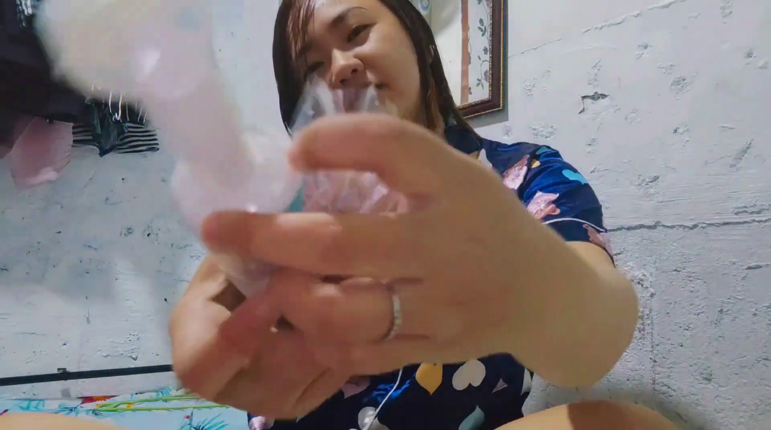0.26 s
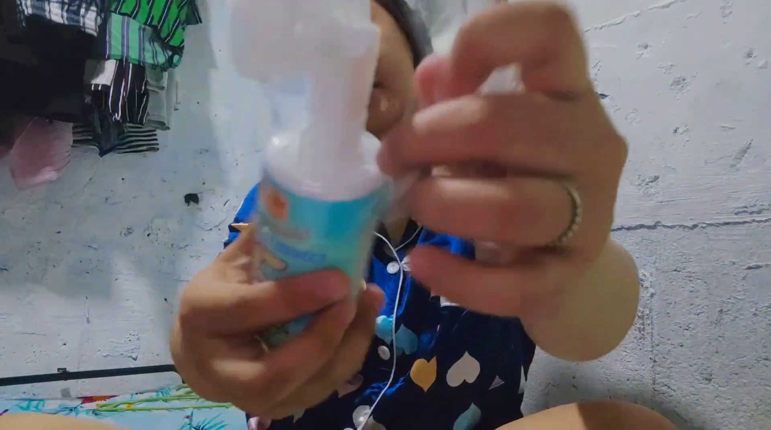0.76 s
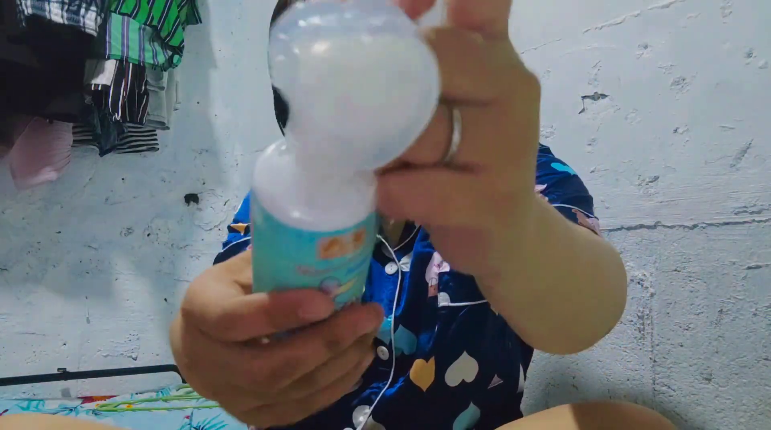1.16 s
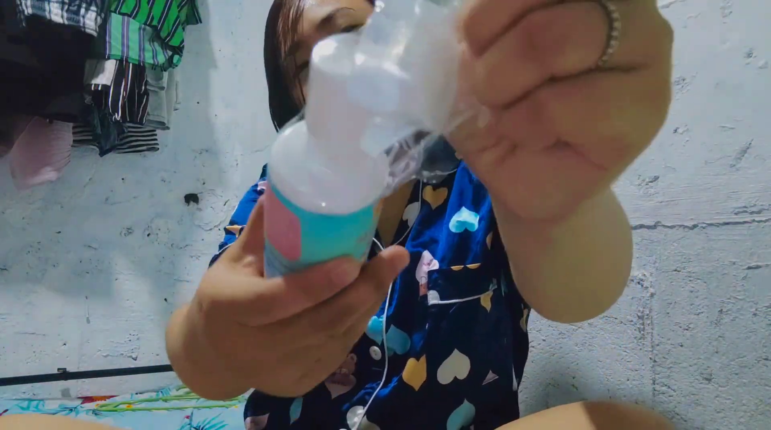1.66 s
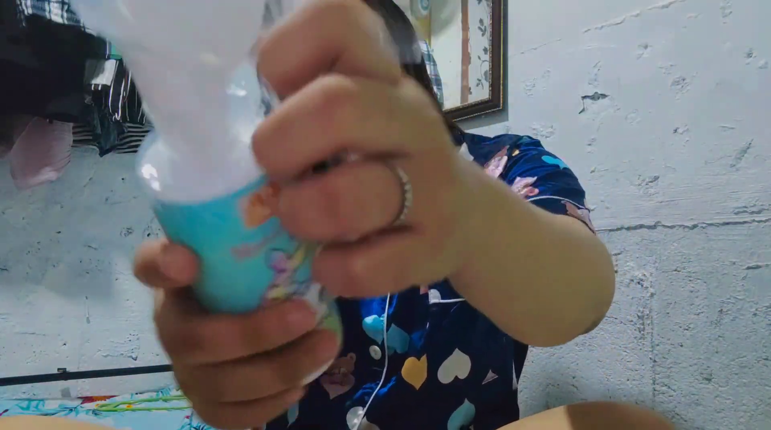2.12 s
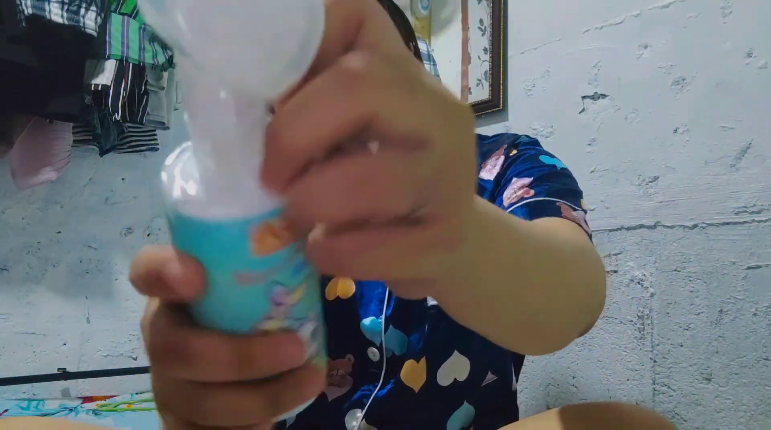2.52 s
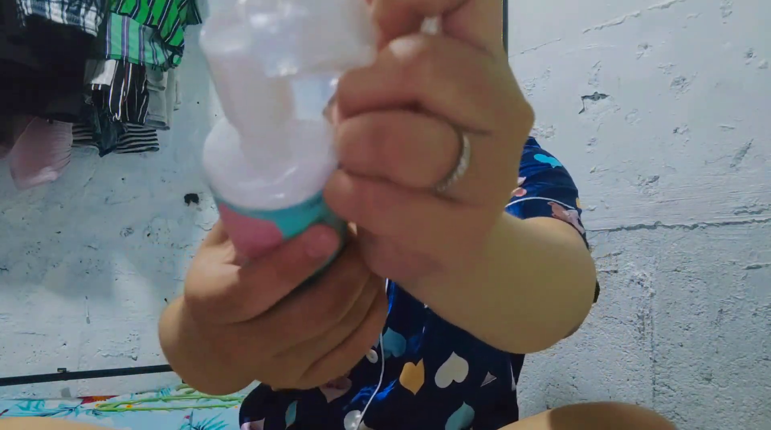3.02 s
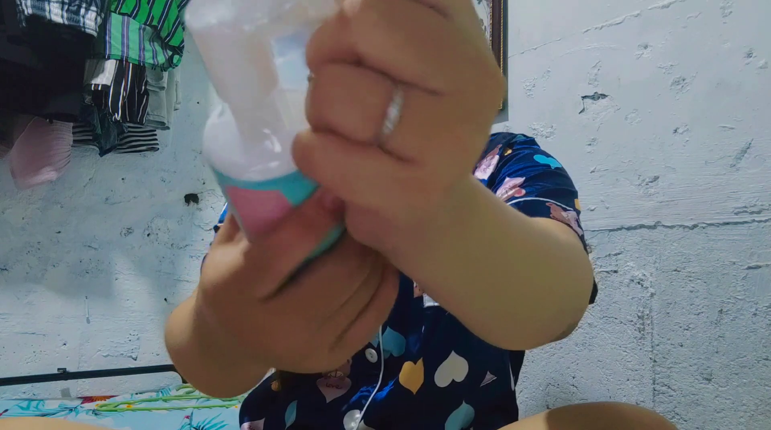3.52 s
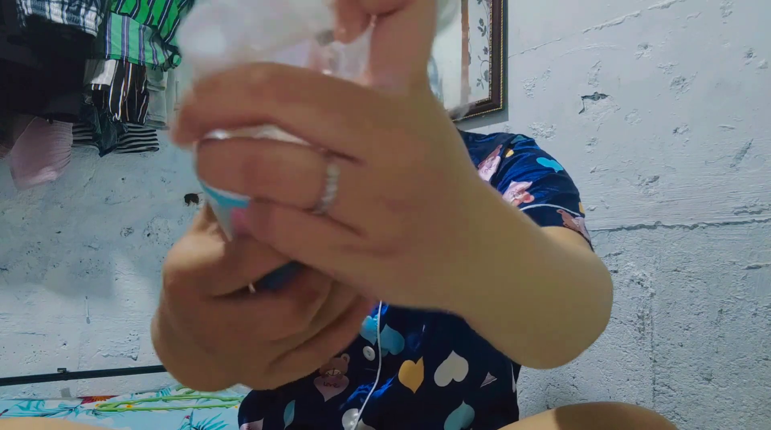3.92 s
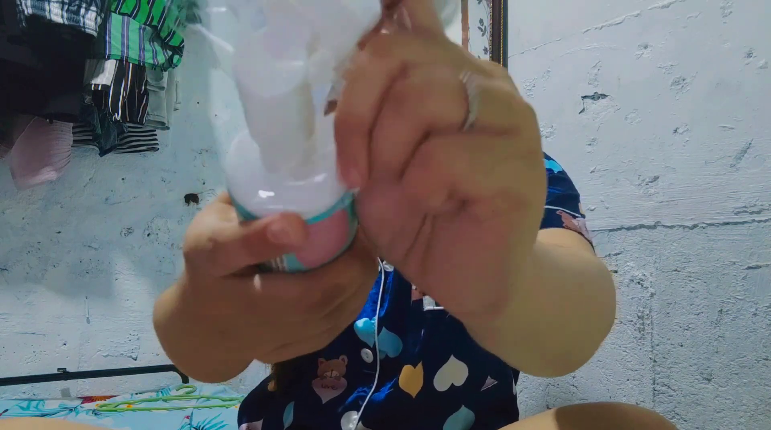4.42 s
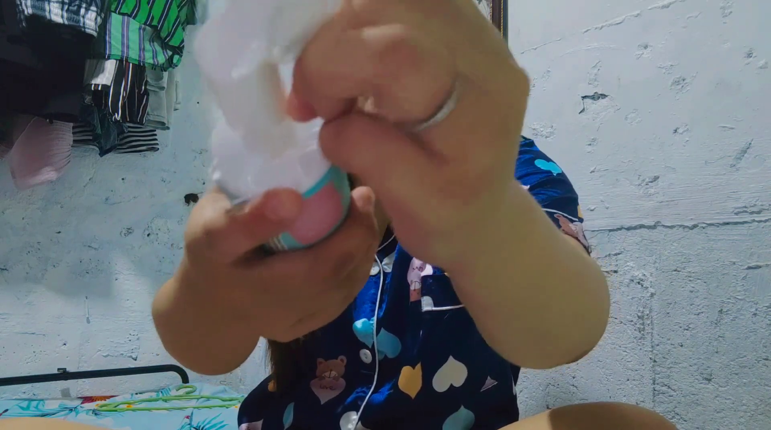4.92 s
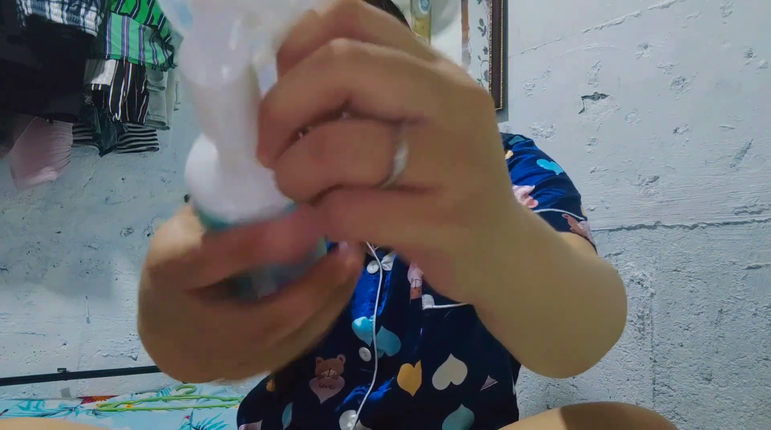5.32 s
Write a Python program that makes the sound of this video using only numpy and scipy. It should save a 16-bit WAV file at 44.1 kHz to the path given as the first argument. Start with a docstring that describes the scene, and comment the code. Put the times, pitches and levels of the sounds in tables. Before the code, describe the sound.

Hands squeeze and pull thin plastic wrap on a small plastic bottle. Dense bright crackling starts at once and continues to the end, in uneven bursts with sharp snaps, hollow pops and tiny high rings. Soft skin rustles and a few low thumps sit beneath. Small hard-walled room with faint appliance hum; very close stereo phone microphone, the loudest snaps clipping.

```python
"""Plastic wrapping crumpled by hand

A hand crumples thin plastic film on a bottle, close to a phone, in a small hard-walled room.
Each crease gives a noise crack, a hollow decaying-sine pop and a brief high ring; many small creases crackle.
Soft rustles, a few low thumps and a noise-made appliance hum join in; the loudest snaps clip."""
import sys
import numpy as np
from scipy import signal
from scipy.fft import rfft, irfft, next_fast_len
from scipy.io import wavfile
from scipy.ndimage import uniform_filter1d

SR = 44100
rng = np.random.default_rng(int(sys.argv[2]) if len(sys.argv) > 2 else 0)


def generate_wav(signal):
    """Clip the signal to [-1, 1] and save it as 16-bit WAV at the path in sys.argv[1]."""
    frames = np.transpose(np.atleast_2d(signal))
    scaled = np.clip(frames, -1, 1) * 32767
    pcm = np.round(scaled).astype(np.int16)
    wavfile.write(sys.argv[1], SR, pcm)


N = 245637
LEAD_S = 0.002  # a crease shape starts this long before its peak


def amp(db):
    """dB to gain."""
    return 10 ** (np.asarray(db) / 20)


def unit(x):
    """Scale to rms 1."""
    return x / np.sqrt(np.mean(x ** 2) + 1e-20)


def along(points, hz):
    """Interpolate (Hz, value) points on a log frequency axis."""
    f, v = np.transpose(points)
    return np.interp(np.log(hz + 1), np.log(f + 1), v)


def filtered(x, response):
    """Multiply the spectrum of x by a complex response of frequency."""
    m = next_fast_len(N + SR // 2)
    spectrum = rfft(x, m) * response(np.fft.rfftfreq(m, 1 / SR))
    return irfft(spectrum, m)[..., :N]


def causal(points):
    """Minimum-phase response with the given dB curve, by folding the cepstrum."""
    def response(hz):
        ceps = irfft(np.log(amp(along(points, hz))))
        half = len(ceps) // 2
        ceps[1:half] *= 2
        ceps[half + 1:] = 0
        return np.exp(rfft(ceps))
    return response


def pair(a, b):
    """Left and right from a shared and an opposed signal: alike in the bass, unrelated in the treble."""
    # Left-right likeness. Each row: frequency in Hz, correlation (1 = identical).
    likeness = [(100, .75), (300, .6), (700, .85), (1500, .55), (3000, .3), (8000, .15), (15000, .1)]

    def mid_side_gains(hz):
        turn = np.arccos(np.clip(along(likeness, hz), -1, 1)) / 2
        return [np.cos(turn), np.sin(turn)]
    mid, side = filtered(np.array([a, b]), mid_side_gains)
    return np.array([mid + side, mid - side])


def room_tone():
    """Appliance hum and faint broad air: stereo noise under a fixed spectral curve."""
    # Spectrum of the tone. Each row: frequency in Hz, relative density in dB.
    tone_curve = [(20, -38), (78, -20), (93, -2), (110, -20.5), (300, -19.5), (1000, -39), (8000, -85),
                  (16000, -63)]
    noise = pair(*rng.standard_normal((2, N)))
    coloured = unit(filtered(noise, lambda hz: amp(along(tone_curve, hz))))
    return amp([[-52], [-54]]) * coloured


def crackle_db(t):
    """Crackle level: each squeeze swells fast, sags while held, fades as the fingers let go."""
    # Closings of the fingers. Each row: full grip at in seconds, hold in seconds,
    # crackle level in dB (relative).
    squeezes = [(0.0, 0.18, -30), (0.09, 0.13, -18.5), (0.341, 0.16, -22.5), (0.598, 0.052, -29),
                (0.676, 0.16, -25.5), (0.86, 0.084, -28.5), (0.989, 0.05, -23.5), (1.115, 0.1, -31),
                (1.236, 0.089, -28.5), (1.384, 0.062, -15), (1.625, 0.11, -24), (1.828, 0.2, -29),
                (2.011, 0.16, -21.5), (2.178, 0.18, -29.5), (2.402, 0.13, -23), (2.589, 0.24, -21),
                (2.884, 0.16, -26.5), (3.113, 0.034, -30), (3.223, 0.04, -30.5), (3.285, 0.067, -19),
                (3.381, 0.11, -27.5), (3.637, 0.25, -21.5), (3.959, 0.065, -19.5), (4.068, 0.41, -26),
                (4.216, 0.22, -22.5), (4.478, 0.13, -23.5), (4.658, 0.27, -26.5), (4.959, 0.14, -32),
                (5.186, 0.057, -17.5), (5.35, 0.0063, -24.5), (5.409, 0.04, -21), (5.498, 0.042, -25)]
    grip_db_per_s, sag_db_per_s, let_go_db_per_s = 748, 14.5, 302
    s, hold, db = np.transpose(squeezes)[:, :, None]
    hold = np.abs(hold)
    swell = grip_db_per_s * np.maximum(s - t, 0)
    sag = sag_db_per_s * np.clip(t - s, 0, hold)
    fade = let_go_db_per_s * np.maximum(t - s - hold, 0)
    power = amp(db - swell - sag - fade) ** 2
    return 10 * np.log10(np.sum(power, axis=0))


def patchy(depth_db):
    """Stereo noise whose colour wanders over time, a little differently at each port."""
    z = signal.stft(rng.standard_normal((2, N)), nperseg=128)[2]
    bins, frames = z.shape[1:]
    field = rng.standard_normal((3, bins, frames))  # shared, left, right
    field = uniform_filter1d(uniform_filter1d(field, size=4, axis=1), size=6, axis=2)
    tilt = uniform_filter1d(rng.standard_normal(frames), size=8) * np.linspace(-1, 1, bins)[:, None]
    field[0] += 0.32 * tilt  # some moments dull, others bright
    field = field - field.mean(axis=1, keepdims=True)  # colour only, loudness comes from the creases
    noise = pair(*signal.istft(z, nperseg=128)[1][:, :N])
    z = signal.stft(noise, nperseg=128)[2]
    z = z * amp(depth_db * unit(field[0] + 0.64 * field[1:]))
    return unit(signal.istft(z, nperseg=128)[1][:, :N])


def lay(s, shapes, pan_db):
    """Add one shape at each time into two channels."""
    start = np.round(np.abs(s - LEAD_S) * SR).astype(int)
    at = (start[:, None] + np.arange(shapes.shape[1])).ravel()
    channels = []
    for side in (1, -1):
        panned = shapes * amp(side * pan_db / 2)[:, None]
        channels.append(np.bincount(at, panned.ravel(), N + SR)[:N])
    return np.array(channels)


def creases(s, crack_db, pop_db, pop_hz, crack_t60_s):
    """Buckling creases: power outlines for noise cracks, plus pops of a few cycles with brief high rings."""
    tick, tick_t60_s = 0.4, 0.004  # extra height of a crack's tip, its decay
    zing_hz_mid, zing_log_spread, zing_db, zing_t60_s = 6500, 0.4, -9, 0.007  # dB re crack
    body_share, body_db = 0.25, 2.5  # how far a crack's low part follows its pop, offset
    pop_cycles = 8.4  # cycles per 60 dB of decay
    t = np.arange(700) / SR - LEAD_S
    luck = rng.standard_normal((len(s), 6))

    life_s = crack_t60_s * np.exp(luck[:, :1] / 5)
    outline = amp(crack_db[:, None] - 60 * np.where(t > 0, t, -3 * t) / life_s)  # swell 3x the fade rate
    outline = outline * (1 + tick * amp(-60 * np.abs(t) / tick_t60_s))  # sharp tick at buckling
    body = outline * amp(body_db + body_share * (pop_db - crack_db))[:, None]

    t = np.maximum(t + 0.001278, 0)  # pop and zing start just before the crack's peak
    hz = pop_hz[:, None]
    ring = amp(-60 * t * hz / pop_cycles) * (1 - np.exp(-t * hz / 0.83))
    glide = 1 + 25 * luck[:, 2:3] * t
    pop = np.sign(luck[:, 1:2]) * amp(pop_db[:, None]) * ring * np.sin(2 * np.pi * hz * t * glide)

    # each crack carries a very short high ring at a random pitch
    zing_hz = np.clip(zing_hz_mid * np.exp(zing_log_spread * luck[:, 4:5]), 4200, 15000)
    zing_level = amp(crack_db[:, None] + zing_db + 3.2 * luck[:, 5:] - 60 * t / zing_t60_s)
    zing = zing_level * np.sin(2 * np.pi * zing_hz * t)

    powers = np.array([lay(s, part ** 2, 3 * luck[:, 3]) for part in (outline, body)])
    pop_pan_db = 6.3 * luck[:, 3] * np.minimum(pop_hz / 1600, 1)  # low pops reach both ports alike
    return powers, lay(s, pop + zing, pop_pan_db)


def bottle(hz):
    """Response of the bottle under the film: the direct pop plus band-pass resonances."""
    # Resonances. Each row: centre in Hz, width in Hz, gain in dB re direct.
    modes = [(674, 27, 1), (928, 153, 3.5)]
    return 1 + sum(amp(db) * 1j * hz * w / (c * c - hz * hz + 1j * hz * w) for c, w, db in modes)


def film():
    """Big snaps over a random crackle that follows the squeezes; crack outlines shape patchy noise."""
    # Loudest creases. Each row: peak at in seconds, crack level in dB, pop pitch in Hz,
    # pop level in dB (levels relative).
    snaps = [(0.056, -7, 1960, -43), (0.097, -13, 1730, -26), (0.119, -3, 2040, 4.5), (0.14, -9, 1980, 0.5),
             (0.182, 0, 1720, -31), (0.199, -4, 640, -19), (0.234, -9.5, 1510, -34), (0.26, -6.5, 2420, -9),
             (0.271, 1, 2250, -4), (0.332, -3, 1940, -22), (0.338, -2, 770, -14), (0.37, -1, 1490, -6),
             (0.378, -0.5, 2900, 7), (0.403, -22, 970, -17), (0.418, 0, 960, -11.5),
             (0.427, -3.5, 1900, -4), (0.431, 1, 1630, -35), (0.459, -12, 1760, -4),
             (0.469, -4.5, 1700, -18), (0.493, -3.5, 2560, -40), (0.541, 0.5, 700, -8.5),
             (0.568, -8.5, 1630, -6), (0.6, -13, 1010, -30), (0.628, -8, 968, -24), (0.652, -2, 1810, -29),
             (0.687, -4, 1950, -5), (0.695, -4.5, 2160, 5), (0.748, -12, 2490, -31),
             (0.783, -5.5, 730, -11.5), (0.802, -1.5, 2850, -15), (0.814, -5, 2400, -23),
             (0.862, -0.5, 1840, -6), (0.867, -1, 820, -5), (0.895, -1.5, 1940, 1.5), (0.926, -9, 238, -24),
             (0.938, -2.5, 1950, -19), (0.981, -15, 960, -14), (1.013, -5, 345, -18),
             (1.029, -17, 970, -12), (1.116, -4.5, 1740, -28), (1.146, -2, 2510, -29),
             (1.155, -9.5, 1700, -15), (1.186, -5, 2470, -2), (1.239, -5.5, 1780, -5), (1.248, -3, 760, -8),
             (1.306, -11, 2830, 3), (1.359, -3.5, 1740, -25), (1.374, 1.5, 910, -11),
             (1.393, -3, 1770, -24), (1.401, -3.5, 970, -4), (1.409, -11, 1800, -6), (1.431, 0, 1780, -1),
             (1.483, -10.5, 1910, -25), (1.497, -7, 1280, -16), (1.613, -16, 1780, -19),
             (1.621, -6.5, 2980, -37), (1.632, -8.5, 950, -15), (1.643, -6.5, 1640, -7),
             (1.661, -1.5, 1980, -4), (1.696, -1, 2450, -43), (1.72, -5.5, 1680, -47),
             (1.71, -11, 3100, -37), (1.8, -6, 1680, -30), (1.807, -9, 2780, -42), (1.852, -10, 696, -38),
             (1.872, -17, 2570, -32), (1.884, -2.5, 1710, -13), (1.894, -7.5, 1630, 5),
             (1.91, -4, 1890, -32), (1.925, -7, 1650, -7), (1.939, 0, 1830, 3), (1.975, -2, 1560, -25),
             (1.993, -15, 2590, -37), (2.014, -6, 2420, -32), (2.023, -1.5, 1700, -12),
             (2.027, 4, 2350, -30), (2.101, -5, 1750, -29), (2.114, -3, 990, -40), (2.168, -22, 1340, -4),
             (2.208, 0, 2580, -29), (2.23, -6.5, 2860, -22), (2.258, -2.5, 2790, -12),
             (2.266, -4.5, 960, -7), (2.368, -15.5, 1900, -19), (2.424, -4.5, 2840, 8.5),
             (2.491, 0, 1660, -11), (2.507, -1, 2130, -1), (2.523, -4, 2740, -13), (2.539, -4.5, 2070, 1),
             (2.578, -5.5, 2100, -8), (2.597, -1, 1880, -2), (2.63, -2.5, 2470, -6), (2.653, 1, 950, -8),
             (2.68, -5, 1760, 7.5), (2.688, -0.5, 1030, -0.5), (2.721, -9, 2920, 12.5),
             (2.73, -5, 1970, -2), (2.759, -22, 1710, 1.5), (2.769, -12, 2510, 7), (2.784, 0.5, 2550, -27),
             (2.802, -9, 2060, 1), (2.847, -9, 1710, 1), (2.858, 0, 1820, 2.5), (2.87, -5, 1800, -29),
             (2.888, -6.5, 1560, 1), (2.895, -13, 1900, -15), (2.906, -20, 1500, 1), (2.932, -1.5, 1510, 2),
             (2.961, -11.5, 2440, -46), (2.968, -10.5, 870, -15.5), (3.018, -8.5, 1650, 4),
             (3.03, -11, 1880, 1.5), (3.037, -9, 1700, -30), (3.091, -2, 2630, -56), (3.104, -2, 2610, -42),
             (3.212, -3, 2500, -6.5), (3.286, -10, 2660, -19), (3.295, -1.5, 1970, 5),
             (3.306, 0.5, 2620, 8), (3.318, 0, 1770, 7), (3.414, -2, 2150, -24), (3.426, -9.5, 2200, -6),
             (3.434, -7, 2290, -38), (3.472, -5, 2170, -3), (3.51, -31, 1650, -8.5),
             (3.54, -29, 1550, -10.5), (3.584, -17, 1330, -35), (3.634, -12, 2100, -6),
             (3.658, -14, 1710, 0), (3.668, -25, 1560, 4.5), (3.681, -21, 2770, -16), (3.69, -11, 3190, 12),
             (3.7, -1, 2000, -27), (3.709, 0, 1880, -6), (3.714, -6.5, 930, -9.5), (3.727, -13, 2000, -23),
             (3.736, -2.5, 2160, 4), (3.755, -14, 1700, -29), (3.777, 2.5, 2020, 4), (3.813, 1, 1720, 4),
             (3.883, -13, 2030, 14), (3.96, -23, 580, -3), (3.978, -6, 1730, 3.5), (3.988, -4, 1500, -28),
             (4.002, -5, 1020, -38), (3.997, -6, 880, -6), (4.01, -3, 1820, -1.5), (4.027, -7, 920, -10),
             (4.082, -1.5, 1900, -6), (4.089, 1.5, 1650, -7), (4.097, -2.5, 870, -10),
             (4.119, -1.5, 2240, -27), (4.165, -9, 1200, 5), (4.192, -6, 1370, -10),
             (4.209, -5.5, 1420, -13), (4.221, -7, 1490, 0), (4.231, -5, 2040, 3.5),
             (4.248, -10, 1740, -2.5), (4.261, -2, 1960, -3), (4.281, 0.5, 1010, -6), (4.268, -7, 1880, 5),
             (4.292, -2, 2000, -20), (4.321, -3, 1800, -5), (4.33, -4.5, 2030, -25), (4.35, -0.5, 1810, -7),
             (4.389, -11, 1040, -8.5), (4.393, -13, 2040, 2), (4.482, -13, 2020, 2),
             (4.508, -15, 2440, -10), (4.551, -7.5, 2560, 9), (4.557, -9, 1650, 0), (4.628, -7, 1810, -14),
             (4.679, -0.5, 990, -10.5), (4.686, -6.5, 1970, -22), (4.708, -6, 1710, -50),
             (4.719, -6, 1710, -46), (4.737, -9, 1010, -20), (4.749, 0.5, 1750, -38),
             (4.766, -1.5, 2690, -22), (4.773, -9, 1060, -8.5), (4.798, -2.5, 1840, 12),
             (4.829, -7.5, 2540, -24), (4.841, -7, 2240, 3), (4.878, -2, 1090, -4.5),
             (4.968, -9, 2250, -24), (4.984, -4.5, 1780, -42), (4.998, 0.5, 1990, -46),
             (5.06, -5, 1740, -44), (5.136, -14, 1020, -21), (5.171, -5, 2380, -27), (5.19, -3, 1910, -35),
             (5.199, -2, 1000, -28), (5.212, 3, 1740, -34), (5.226, 2, 2450, -36), (5.312, -13.5, 1690, -5),
             (5.324, -20, 1520, -1), (5.358, -4, 1570, 6), (5.406, -5.5, 1840, -5), (5.417, -13, 1980, -27),
             (5.432, -15, 1810, 2), (5.445, -5, 960, -0.5), (5.46, 4, 2380, -22), (5.471, -3, 960, -4.5),
             (5.497, -5, 1790, -26), (5.523, -4.5, 2700, -3), (5.532, -15, 1830, -16),
             (5.541, 0, 2900, -25), (5.558, -5, 1730, -29)]
    split_hz = 3000  # below it cracks follow their pops: tight creases thin, hollow ones full
    s, crack_db, hz, pop_db = np.transpose(snaps)
    big, big_pops = creases(s, crack_db, pop_db, hz, crack_t60_s=0.013)

    luck = rng.random((3600, 4))
    s = luck[:, 0] * N / SR
    size_db = crackle_db(s) - 3.77 * np.log(luck[:, 1] + 0.091)  # many tiny creases, few large
    hz = 200 * 16 ** luck[:, 2] ** 0.685
    pop_db = size_db - 17.5 + 11 * luck[:, 3]
    small, small_pops = creases(s, size_db + 3, pop_db, hz, crack_t60_s=0.018)

    outlined, bodied = np.sqrt(big) * patchy(depth_db=2.0) + np.sqrt(small) * patchy(depth_db=5.5)
    low = lambda hz: 1 / (1 + (hz / split_hz) ** 2)
    rumble_cut = lambda hz: (1j * hz / (750 + 1j * hz)) ** 2
    cracks = filtered(outlined, lambda hz: 1 - low(hz)) + filtered(bodied, lambda hz: low(hz) * rumble_cut(hz))
    return cracks + filtered(big_pops + small_pops, bottle)


def walls(x):
    """Room answer: decaying noise, each frequency at its own speed, drawn anew for each short block."""
    # Decay of the room. Each row: frequency in Hz, t60 in seconds.
    decay = [(200, 0.022), (2000, 0.18), (7000, 0.11), (13000, 0.032)]
    out, step = np.zeros((2, N + SR)), 2048
    for at in range(0, N, step):
        hz, t, z = signal.stft(rng.standard_normal((2, SR // 5)), SR, nperseg=256)
        fade = amp(-60 * t / along(decay, hz)[:, None])
        tail = signal.istft(z * fade, SR, nperseg=256)[1][:, 64:]
        tail = tail / np.linalg.norm(tail[0])
        answer = signal.fftconvolve(x[:, at:at + step], tail, axes=1)
        out[:, at + 130:at + 130 + answer.shape[1]] += answer  # 130 samples late
    return out[:, :N]


def ports(wrap):
    """Two microphone ports colour the film differently; the right one is a little further away."""
    # Port colours. Each row: frequency in Hz, relative gain in dB.
    left_curve = [(25, -21), (120, -1.5), (500, -9.5), (900, -8.5), (1150, -12), (1750, -5), (2050, -15.5),
                  (2400, -9.5), (4200, -13), (6500, -9.5), (7200, -17), (11500, -9.5), (11800, 1),
                  (15400, -9), (15800, -39)]
    right_curve = [(25, -9.5), (120, -1.5), (500, -13), (1000, -8), (1500, -17), (2000, -7), (3000, -10.5),
                   (4300, -12), (6700, -9), (7200, -10), (8500, -8.5), (10500, -16.5), (12000, -13.5),
                   (15400, -20), (15800, -45)]
    delay_s = 0.00012
    left = filtered(wrap[0], causal(left_curve))
    right = filtered(wrap[1], lambda hz: causal(right_curve)(hz) * np.exp(-2j * np.pi * hz * delay_s))
    return np.array([left, right])


def handling():
    """Soft low rustles of skin as the bottle shifts in the hand: band noise under Gaussian swells."""
    # Rustles. Each row: peak at in seconds, rms level at the peak in dB.
    rustles = [(.2, -31), (.93, -44), (1.02, -32), (1.42, -33.5), (2.02, -29.5), (2.66, -33)]
    t = np.arange(N) / SR
    swell = sum(amp(db) * np.exp(-((t - s) / 0.067) ** 2) for s, db in rustles)
    band = lambda hz: amp(along([(90, -24), (200, -13.0), (350, -7.5), (700, -16.5)], hz))
    return swell * unit(filtered(pair(*rng.standard_normal((2, N))), band))


def thumps():
    """Low thumps: single pulses with a fast rise and slower fall, high-passed."""
    # Thumps. Each row: peak at in seconds, level before the high-pass in dB.
    thump_rows = [(3.319, -18), (4.119, -30), (4.388, -31), (4.999, -15)]
    corner_hz = 60.3  # high-pass corner
    s, db = np.transpose(thump_rows)
    t = np.arange(500) / SR - 0.006
    pulse = np.exp(np.where(t < 0, t / 0.00051, -t / 0.0017))
    pulses = lay(s - 0.004, amp(db)[:, None] * pulse, np.full(len(s), 1.5))
    return filtered(pulses, lambda hz: 1j * hz / (corner_hz + 1j * hz))


def scene():
    """Film and its room answer through the ports, plus thumps, handling and room tone."""
    wrap = film()
    wrap = wrap + amp(-11.5) * walls(wrap)  # the film is much nearer than the walls
    return amp(3.5) * ports(wrap) + thumps() + handling() + room_tone()


def record(dry):
    """Hard clipping at full scale, then a band limit."""
    top_hz = 16500
    return filtered(np.clip(dry, -1, 1), lambda hz: hz < top_hz)


dry = scene()
out = record(dry)
generate_wav(out)
```